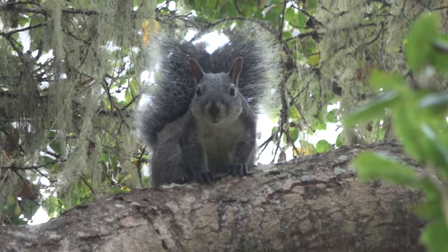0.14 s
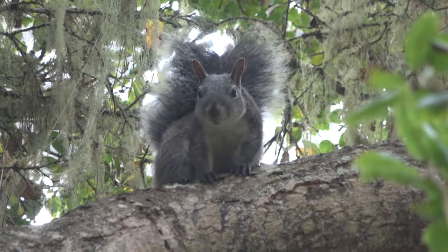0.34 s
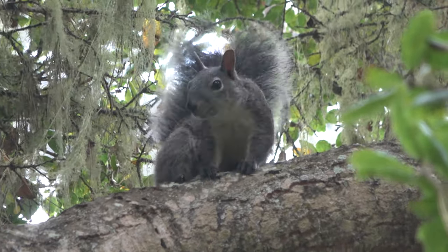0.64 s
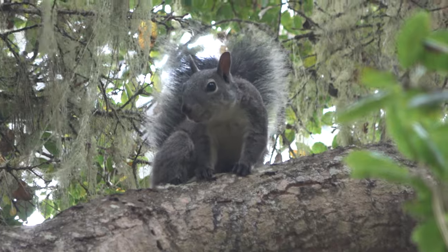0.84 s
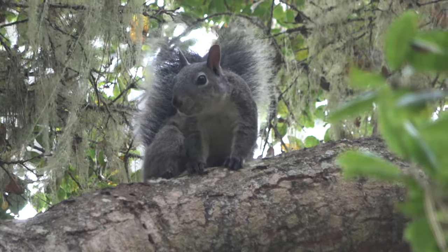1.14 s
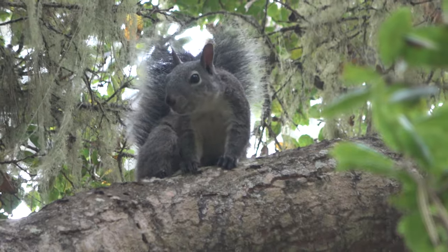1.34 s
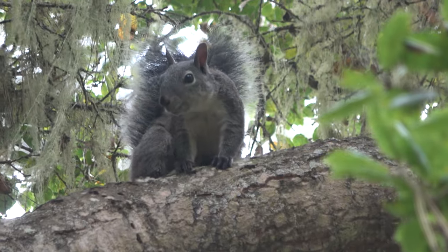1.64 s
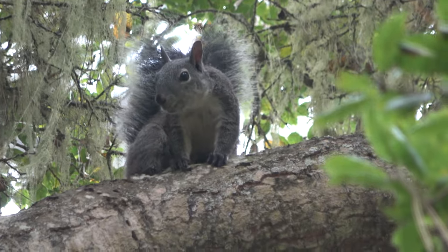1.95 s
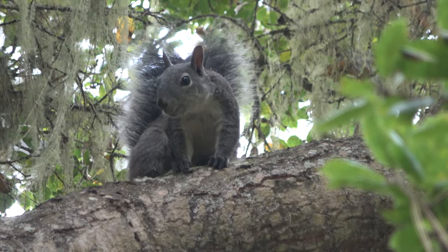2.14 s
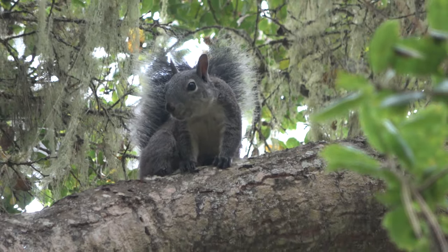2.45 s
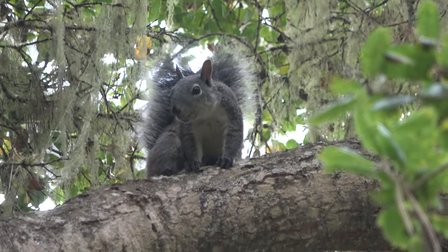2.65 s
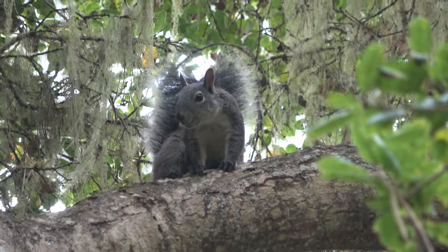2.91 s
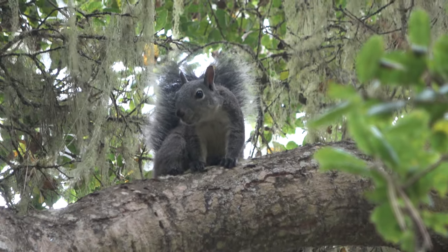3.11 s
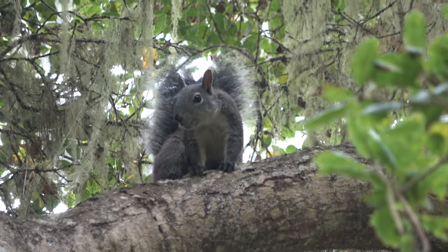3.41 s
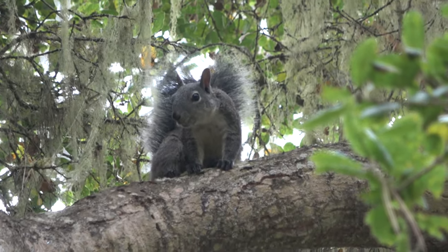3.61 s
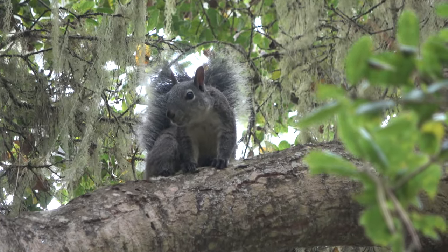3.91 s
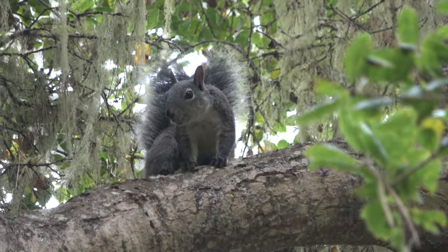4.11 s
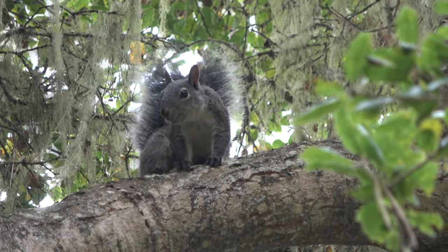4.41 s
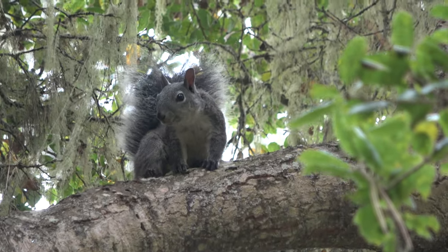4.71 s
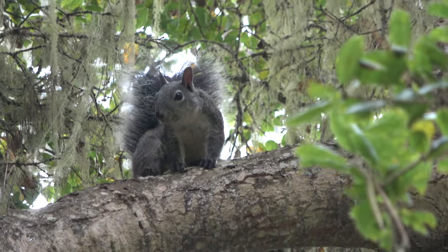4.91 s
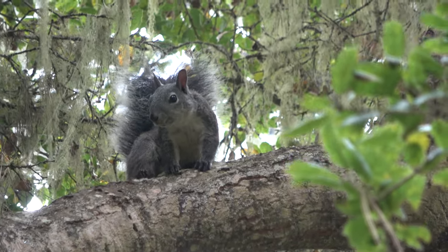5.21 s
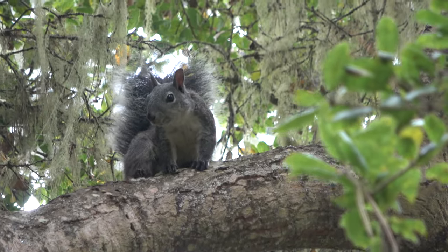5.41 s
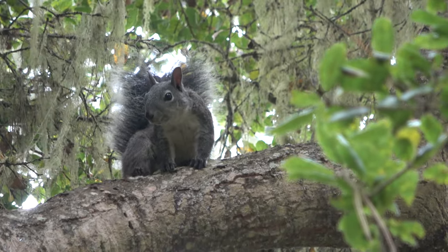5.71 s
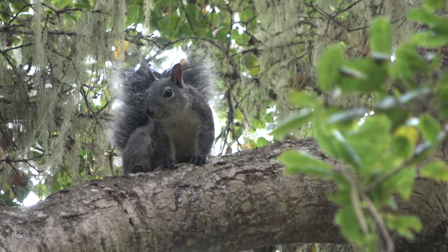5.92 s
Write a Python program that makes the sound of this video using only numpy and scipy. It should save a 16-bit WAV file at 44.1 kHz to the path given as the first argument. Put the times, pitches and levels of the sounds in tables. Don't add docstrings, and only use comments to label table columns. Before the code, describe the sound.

Outdoors in a wood, twig ticks and a leaf rustle come first, with thin, faint bird peeps. Then a squirrel barks thirteen times, each a harsh upward chirp followed by a brief low falling note on the indrawn breath. The barks start quick and rough, then become longer, duller and more spaced. Trees scatter the calls into a light tail. Distant traffic rumbles softly; the stereo microphone is fairly close and the squirrel sits near centre.

```python
import sys
import numpy as np
from scipy import signal
from scipy.fft import rfft, irfft, next_fast_len
from scipy.io import wavfile
from scipy.ndimage import uniform_filter1d

SR = 44100
rng = np.random.default_rng(int(sys.argv[2]) if len(sys.argv) > 2 else 0)


def how_loud(loudness_db):
    steps = np.asarray(loudness_db, float) / 20
    return 10 ** steps


def waveform_to_disk(signal):
    frames = np.transpose(np.atleast_2d(signal))
    scaled = np.clip(frames, -1, 1) * 32767
    samples = np.round(scaled).astype(np.int16)
    wavfile.write(sys.argv[1], SR, samples)


N = 267025
FAST = next_fast_len(N + SR)

# f/Hz, level/dB per Hz
TRAFFIC_SPECTRUM = [(12, -38), (20, -6), (49, -2.5), (85, -9), (186, 0.5), (325, -1.5), (466, -6.5),
                    (521, -9.5), (583, -10), (770, -9.5), (886, -17.5), (1350, -19.5), (2350, -35.5),
                    (6590, -37), (15600, -42.5)]
# f/Hz, likeness/0-1
TRAFFIC_LIKENESS = [(60, 0.98), (180, 0.99), (550, 0.97), (1650, 0.91), (4970, 0.81), (15000, 0.27)]
# f/Hz, balance/dB
TRAFFIC_BALANCE = [(60, -0.5), (150, -4.5), (380, -4.5), (950, -1.5), (2380, -4.5), (5980, 1),
                   (15000, -1.5)]
# t/s, length/s, level/dB, left-right/dB
RUSTLES = [
    (0, 0.024, -68, -2),
    (.33, 0.088, -55, -5),
    (0.415, 0.1, -67, -2.5),
    (3.971, .024, -55, -4),
    (3.984, 0.095, -65.5, .5),
    (4.587, 0.078, -69, -4),
    (5.09, .03, -64, -3),
    (5.116, .1, -64, .5),
    (5.993, .055, -69, -2.5),
]
# f/Hz, level/dB per Hz
LEAF_SPECTRUM = [(880, -32), (1500, -10), (2430, 3.5), (3010, 0.5), (4370, 3), (6930, 7), (9670, 1),
                 (15600, -11)]
# t/s, peak/dB, f/Hz, left-right/dB
TICKS = [(0.0663, -47, 5100, -0.5), (0.1411, -57, 5850, -3.0), (0.2594, -46, 3750, 1.0),
         (0.277, -44, 7270, 3.0), (0.3528, -24, 3020, -7), (0.428, -38, 7370, -8), (0.4354, -44, 7850, -4),
         (0.4715, -42, 6070, -3.0), (0.726, -45, 7150, -2.5), (4.403, -43, 6800, -1),
         (4.5875, -35.5, 4600, -8), (4.79, -45.5, 6350, -8), (4.9315, -44, 3270, -3.0),
         (5.094, -49, 7320, -2.5), (5.108, -42, 6500, -14), (5.1285, -44, 6320, 6), (5.426, -46, 5500, -9),
         (5.565, -39, 5800, -6), (5.69, -40.5, 6460, -5), (5.8275, -41.5, 6070, -0.5),
         (5.995, -42.5, 5200, -3.0)]
# f/Hz, time/s
WOOD_DECAY = [(500, 2.6), (1500, 1.26), (3000, 1.39), (6500, 0.79), (12000, 0.76)]
# f/Hz, likeness/0-1
WOOD_LIKENESS = [(1500, .8), (3200, .95), (6500, .72), (12000, .5)]
# f/Hz, level/dB
WOOD_COLOUR = [(600, -9), (1500, -9.5), (2800, 8.5), (4000, -1), (6500, 9.5), (12000, 0.5)]
# f/Hz, balance/dB
CALL_BALANCE = [(600, -2), (1500, 1), (3200, -1.7), (6500, 0.2), (9000, -1.5), (13000, 2)]
# t/s, length/s, first f/Hz, last f/Hz, level/dB
PEEPS = [
    (0.187, 0.16, 7020, 7450, -58.5),
    (0.31, 0.033, 7300, 6760, -62),
    (.38, 0.043, 6800, 7000, -66),
    (0.513, .03, 7200, 7470, -59),
    (.56, 0.074, 7700, 6500, -61),
    (3.684, 0.019, 6900, 6970, -55.5),
    (5.64, 0.12, 7230, 7300, -68),
]
# t/s, length/s, first f/Hz, level/dB
INDRAWN = [(.941, 0.047, 684, -41), (1.17, 0.044, 704, -40), (1.395, .04, 706, -40),
           (1.623, .042, 674, -40), (1.866, 0.039, 611, -42), (2.11, 0.0447, 572, -45),
           (2.368, 0.039, 545, -44.5), (2.632, 0.032, 516, -45.5), (2.905, 0.047, 503, -48.5),
           (3.18, 0.049, 520, -48), (3.482, .036, 516, -50), (3.862, 0.03, 511, -46.5),
           (4.23, 0.045, 550, -49.5)]
# f/Hz, level/dB
INDRAWN_THROAT = [(300, -4), (650, 0), (950, -10), (1350, -1), (1600, -6), (1850, -22), (2500, -22),
                  (3200, -34), (5000, -50)]
# t/s, length/s, attack/s, release/s, level/dB
BARKS = [(0.84, 0.086, 0.017, 0.027, -28.5), (1.078, 0.077, 0.0089, 0.029, -28),
         (1.298, 0.076, 0.013, 0.015, -29.5), (1.518, 0.087, 0.01, 0.019, -29.5),
         (1.755, 0.085, 0.012, 0.012, -29), (1.991, 0.1, 0.014, 0.036, -30.5),
         (2.237, 0.11, 0.018, 0.0076, -30), (2.5, 0.11, 0.022, 0.01, -28.5),
         (2.768, 0.12, 0.024, 0.0069, -30), (3.043, .120, 0.033, 0.0085, -30),
         (3.340, .130, 0.057, 0.0085, -28.5), (3.729, .116, 0.062, .006, -29),
         (4.082, 0.13, 0.098, 0.0096, -31.5)]
# first f/Hz, f after the glide/Hz, glide/s, f it creeps towards/Hz, final sag/0-1
PITCH = [(1042, 1590, .024, 1660, 0.04), (1035, 2000, 0.02, 1500, 0.08), (1100, 1685, .027, 1620, 0.12),
         (1197, 1680, 0.029, 1640, 0.06), (1190, 1700, .033, 1600, .02), (1190, 1690, 0.044, 1610, .05),
         (1170, 1520, 0.032, 1690, .16), (1162, 1540, .030, 1640, 0.3), (1150, 1545, .039, 1600, 0.2),
         (1170, 1500, .045, 1590, .09), (1180, 1585, 0.091, 1520, .08), (1240, 1510, .086, 1510, 0.2),
         (1198, 1440, .097, 1430, .13)]
# brightness/dB, mouth opening/dB, swell of the held part/dB, air leak/dB
EFFORT = [(0, -4, 2, 3.5), (-0.5, -4, -0.5, 1.5), (1, -3, 0, -0.5), (0.5, -2.5, -0.5, -0.5),
          (0.5, -2.5, 0, -0.5), (1.5, -2, 3, -1.5), (-0.5, -4.5, -0.5, -1), (-1.5, -4.5, -0.5, -2),
          (-3, -2.5, 2, 1.5), (-3.5, -2.5, 4, 4), (-6, -4.5, 1.5, 4), (-8, -8, -1, .5), (-8, -5.5, 2, .5)]
# t after the start/s, roughness/0-1, wobble of the fundamental/0-1,
# pattern depth/0-1, pattern length/cycles
VOICE_BREAK = [(.024, .9, .6, .1, 4), (.02, .9, .6, .1, 4), (.023, .8, .6, .3, 5), (.023, .8, .55, .2, 4),
               (.045, .8, .5, .4, 2), (.064, .65, .38, .25, 4), (.026, .22, .2, .3, 3),
               (.033, .4, .15, .6, 4), (.038, .17, .08, .9, 4), (.053, .5, .1, .55, 4),
               (.078, .65, .1, .15, 4), (.084, .07, .05, 0, 4), (.105, .05, .05, 0, 4)]
# f/Hz, width/Hz, level/dB
MOUTH = [(2300, 800, 6), (2710, 180, 3.5), (3388, 540, 12), (3917, 286, -3)]
# f/Hz, width/Hz, level/dB
NOSE = [(5100, 440, 11), (5850, 350, -10.5), (6586, 810, 14), (7970, 630, 4.5), (8450, 2550, -1.5)]
# f/Hz, width/Hz, level/dB
AIR = [(10460, 1100, -10), (12360, 1600, -1.5), (15070, 1100, -8)]


def rms_one(x):
    return x / np.sqrt(np.mean(x ** 2) + 1e-20)


def at_hz(points, hz):
    table = np.array(points)
    return np.interp(np.log(hz + 1), np.log(table[:, 0]), table[:, 1])


def bins_hz(count):
    return np.fft.rfftfreq(count, 1 / SR)


def slow(rate_hz):
    r = np.exp(-2 * np.pi * rate_hz / SR)
    drift = signal.lfilter([1], [1, -2 * r, r * r], rng.standard_normal(N + SR))
    return rms_one(drift[SR:])


def resonate(x, hz, width_hz):
    r = np.exp(-np.pi * width_hz / SR)
    return signal.lfilter([(1 - r * r) / 2, 0, (r * r - 1) / 2],
                          [1, -2 * r * np.cos(2 * np.pi * hz / SR), r * r], x)


def panned(x, pan_db):
    return np.array([x * how_loud(pan_db / 2), x * how_loud(-pan_db / 2)])


def widen(mid, side, alike):
    return np.sqrt(1 + alike) * mid + np.sqrt(1 - alike) * side * [[1], [-1]]


def stroke(count, rise):
    done = np.arange(count) / count
    return np.clip(done / rise, 0, 1) * np.clip((1 - done) / .25, 0, 1), done


def rumble():
    hz = bins_hz(FAST)
    mid, side = rfft(rng.standard_normal((2, FAST))) * how_loud(at_hz(TRAFFIC_SPECTRUM, hz))
    pair = widen(mid, side, np.clip(at_hz(TRAFFIC_LIKENESS, hz), 0, 1))
    noise = irfft(pair * panned(1, at_hz(TRAFFIC_BALANCE, hz)), FAST)[:, :N]
    breathing_db = 0.95 * slow(5.8)
    return how_loud(-42.5 + breathing_db) * rms_one(noise)


def rustles():
    rise_share, fade_db = 0.22, 9
    level = np.zeros((2, N + SR))
    for s, length, level_db, pan_db in RUSTLES:
        swell, done = stroke(round(length * SR), rise_share)
        at = round(s * SR)
        level[:, at:at + len(done)] += panned(swell * how_loud(level_db - fade_db * done), pan_db)
    grains = rng.standard_normal((2, N)) * how_loud(1.5 * slow(300))
    grains = grains[0] + 0.26 * grains[1] * [[1], [-1]]
    leaves = irfft(rfft(grains, FAST) * how_loud(at_hz(LEAF_SPECTRUM, bins_hz(FAST))), FAST)[:, :N]
    return level[:, :N] * how_loud(7.5) * rms_one(leaves)


def ticks():
    count = 400
    out, t = np.zeros((2, N)), np.arange(count) / SR
    all_grit = rng.standard_normal((len(TICKS), count))
    for (s, peak_db, hz, pan_db), grit in zip(TICKS, all_grit):
        click = (t == 0) * 5
        burst = (click + grit) * how_loud(-60 * t / .007)
        snap = resonate(burst, hz, 1.1 * hz)
        wood_dulls = signal.butter(3, min(1.7 * hz, 14000), fs=SR, output="sos")
        snap = signal.sosfilt(wood_dulls, snap)
        at = round(s * SR)
        out[:, at:at + count] += panned(how_loud(peak_db) * snap / np.abs(snap).max(), pan_db)
    return out


def wood(x):
    trunks_db, near_leaves_db = -8.5, -1.5
    t, hz = np.arange(SR) / SR, bins_hz(FAST)
    white, tail = rng.standard_normal((2, SR)), 0
    edges = 350 * 2 ** np.arange(0, 6.)
    for low, high in zip(edges, np.minimum(2 * edges, .45 * SR)):
        band_filter = signal.butter(2, [low, high], "band", fs=SR, output="sos")
        decay_s = at_hz(WOOD_DECAY, np.sqrt(low * high))
        tail = tail + signal.sosfilt(band_filter, white) * how_loud(-60 * t / decay_s)
    tail *= np.clip(t / 0.0057, 0, 1)
    near = rng.standard_normal((2, SR)) * how_loud(-60 * t / .17) * np.clip(t / .002, 0, 1)
    echoes = how_loud(trunks_db) * rms_one(tail) + how_loud(near_leaves_db) * rms_one(near)
    mid, side = rfft(echoes, FAST) / np.sqrt(2 * SR)
    alike = np.clip(at_hz(WOOD_LIKENESS, hz), 0, 1)
    scatter = how_loud(at_hz(WOOD_COLOUR, hz)) * widen(mid, side, alike)
    balance = panned(0.94, at_hz(CALL_BALANCE, hz))
    return irfft(rfft(x, FAST) * (1 + scatter) * balance, FAST)[:, :N]


def bird():
    out, blur, waver = np.zeros(N), slow(150) + 1j * slow(150) + .9, slow(25)
    for s, length, first_hz, last_hz, level_db in PEEPS:
        swell, done = stroke(round(length * SR), .4)
        at = round(s * SR)
        span = slice(at, at + len(swell))
        hz = (first_hz + (last_hz - first_hz) * done) * (1 + 0.023 * waver[span])
        whistle = np.exp(2j * np.pi * np.cumsum(hz) / SR)
        out[span] = swell * how_loud(level_db - 12.0) * np.real(blur[span] * whistle)
    return out


def indrawn():
    end_hz = 418
    out, shake, flutter = np.zeros(N), slow(112), slow(200)
    for s, length, first_hz, level_db in INDRAWN:
        at, done = round(s * SR), np.arange(round(length * SR)) / (length * SR)
        span = slice(at, at + len(done))
        weak = np.clip((s - 2.2) / .5, 0, 1)
        hz = first_hz + (end_hz - first_hz) * done ** 1.6
        hz = hz * (1 + (.01 + .05 * weak) * shake[span])
        phase = 2 * np.pi * np.cumsum(hz) / SR
        voice = 0
        for k in range(1, 9):
            overtone_db = at_hz(INDRAWN_THROAT, k * hz) - 3.8 * weak * (k == 1)
            voice = voice + how_loud(overtone_db) * np.cos(k * phase + k * k)
        swell = np.clip(done / 0.098, 0, 1) * np.clip((1 - done) / 0.022, 0, 1) * how_loud(-6.0 * done)
        out[span] = how_loud(level_db + 7) * swell * voice * (1 + 0.084 * flutter[span])
    return out


def throat(x, modes, size):
    y = 0
    for k, (hz, width_hz, db) in enumerate(modes):
        ring = resonate(resonate(x, size * hz, width_hz), size * hz, width_hz)
        y = y + (-1) ** k * how_loud(db) * ring
    return y / np.sqrt(uniform_filter1d(y ** 2, size=700) + 1e-9)


def bark_pitch(t, length, tired, first_hz, knee_hz, glide, creep_to_hz, sag):
    bend, creep_s, droop_hz_per_s = 1.1, .03, 149
    slack = np.clip(1 - t / glide, 0, 1) ** bend
    held = np.maximum(t - glide, 0)
    hz = creep_to_hz - (creep_to_hz - knee_hz) * np.exp(-held / creep_s)
    hz = hz - (knee_hz - first_hz) * slack - droop_hz_per_s * held
    sag_s = 0.02215 * (1 - 0.405 * tired)
    return hz * (1 - sag * np.clip(1 - (length - t) / sag_s, 0, 1) ** 2)


def effort_db(t, rise, closing, over_db, start_db, steep, release_db):
    return over_db - start_db * np.clip(1 - t / rise, 0, 1) ** steep - release_db * closing


def barks():
    break_loss_db, break_heal_s = 14, 0.015
    break_gain_db = 2.5
    out, slow_shake, late_shake, size_shake = np.zeros(N), slow(130) + 1j * slow(320), slow(300), slow(1840)
    breath = rng.standard_normal(N)
    chest = signal.cheby2(6, 26, 2020, fs=SR, output="sos")
    nose_branch = signal.butter(2, [4200, 5300], "bandstop", fs=SR, output="sos")
    for bark, pitch, effort, voice in zip(BARKS, PITCH, EFFORT, VOICE_BREAK):
        s, length, attack, release, level_db = bark
        bright_db, open_db, swell_db, leak_db = effort
        start, rough, wobble, depth, cycles = voice
        span = slice(round((s - .02) * SR), round((s + length + .02) * SR))
        t = np.arange(N)[span] / SR - s
        tired = np.clip((s - 2.2) / 1.2, 0, 1)
        hz = bark_pitch(t, length, tired, *pitch)
        phase = 2 * np.pi * np.cumsum(hz) / SR

        closing = np.clip(1 - (length - t) / release, 0, 1)
        gate = np.clip(np.minimum(t, length - t) / .003 + .5, 0, 1)
        opening = 0.032 + pitch[2]
        tone_db = level_db + 0.01 * bright_db + effort_db(t, attack, closing, 0.13, 19.6, 0.97, 5.9)
        mouth_db = level_db + 0.26 * bright_db + effort_db(t, opening, closing, -2, 6, 1.66, -0.5)
        nose_db = level_db + 1.53 * bright_db + effort_db(t, opening, closing, -6, 11, 3.3, 10)
        air_db = level_db + 2.4 * bright_db + effort_db(t, opening, closing, -14, 41, 4.2, 0)
        arch_db = -9 * (t / length - 0.44) ** 2

        broken = np.clip((t - start) / 0.0013, 0, 1)
        shake = .02 + .55 * wobble + (rough - .55 * wobble) * broken
        pattern = depth * broken * (np.cos(phase / cycles) + 0.19 * np.cos(2 * phase / cycles + 1))
        late = .35 * shake * late_shake[span] + .19 * pattern
        size = 1 + shake * size_shake[span] + pattern
        pulses = size * sum(np.cos(k * (phase + late)) * (k * hz < .45 * SR) for k in range(2, 14))
        pulses += 3.5 * shake ** 1.5 * breath[span]

        swing = 1 + wobble * broken * slow_shake[span] + 0.18 * pattern
        limited = swing / (np.abs(swing) + .1) ** .25
        tone = signal.sosfilt(chest, np.real(limited * np.exp(1j * phase)))
        tone_db = tone_db - break_loss_db * wobble * broken * np.exp(-np.abs(t - start) / break_heal_s)
        tone = how_loud(tone_db + swell_db * (2 * t / length - 0.5) + 2.5) * tone

        mouth_size = 1.0385 + (0.96 - 1.0385) * tired
        nose_size = 0.95 + (1.02 - 0.95) * tired
        top_hz, top_width_hz, top_db = MOUTH[-1]
        lips = list(MOUTH[:-1]) + [(top_hz, top_width_hz, top_db + 16.5 * tired ** 2)]
        groups = [(lips, mouth_size, mouth_db + open_db), (NOSE, nose_size, nose_db),
                  (AIR, nose_size, air_db + leak_db)]
        freed_db = arch_db - break_gain_db * rough * (1.5 - broken) - 5.0
        overtones = sum(how_loud(db + freed_db) * throat(pulses, modes, factor) for modes, factor, db in groups)
        out[span] = gate * (tone + .3 * overtones + .7 * signal.sosfilt(nose_branch, overtones))
    return out


def scene():
    calls = barks() + indrawn() + bird()
    return wood(calls) + ticks() + rustles() + rumble()


def top_cut(x):
    return signal.sosfilt(signal.butter(12, 15780, fs=SR, output="sos"), x)


def record(dry):
    return top_cut(dry)


dry = scene()
out = record(dry)
waveform_to_disk(out)
```